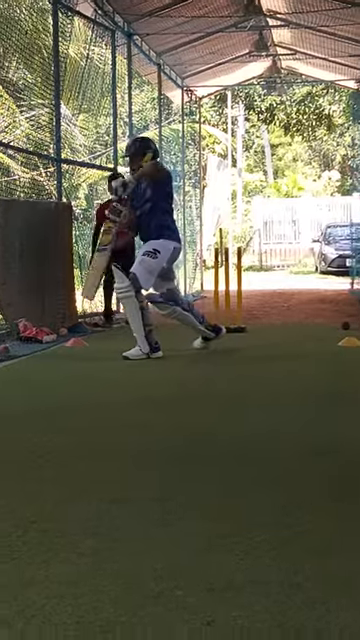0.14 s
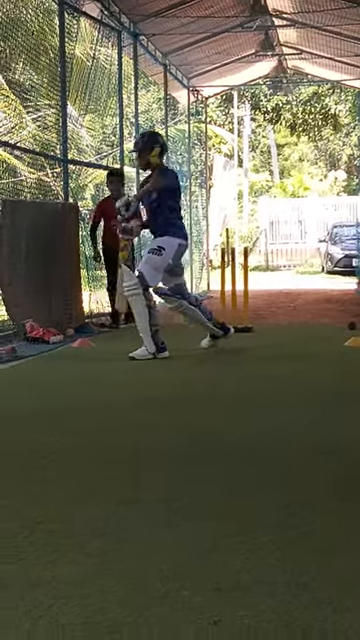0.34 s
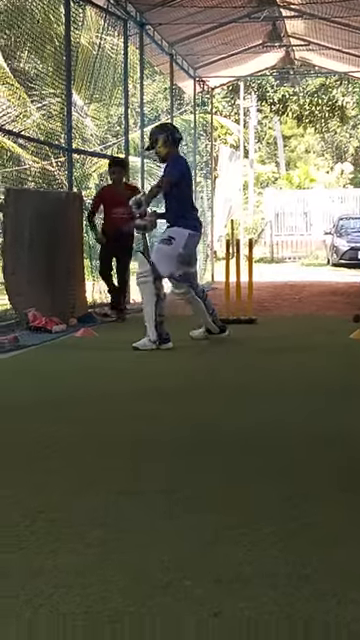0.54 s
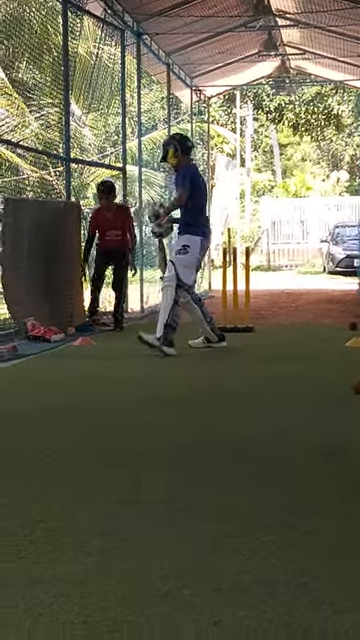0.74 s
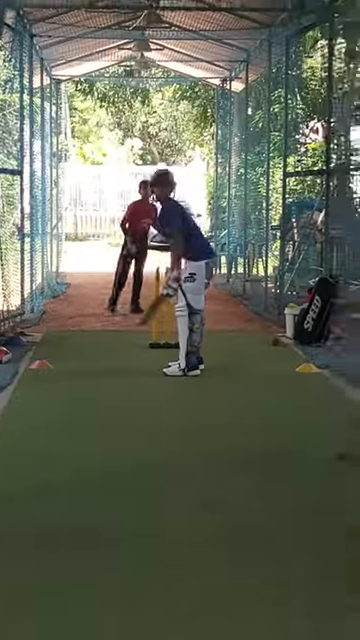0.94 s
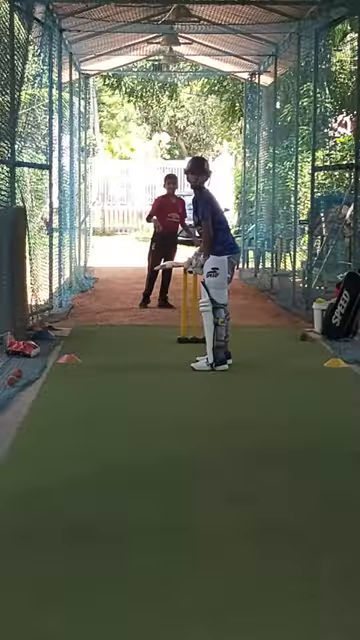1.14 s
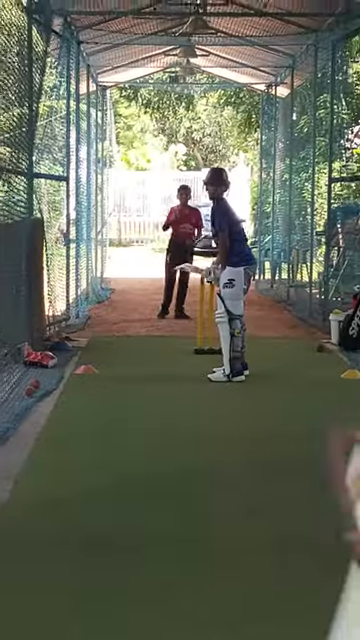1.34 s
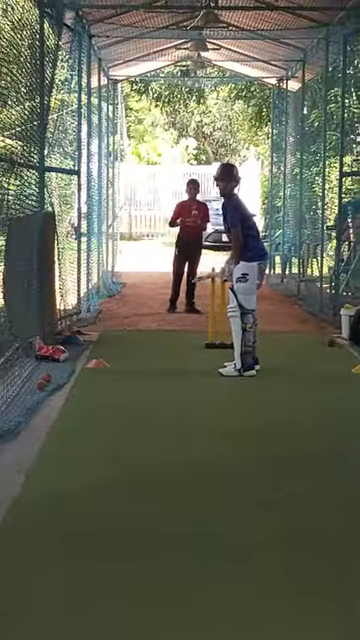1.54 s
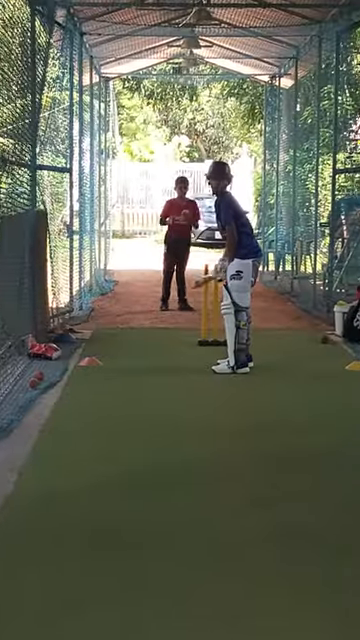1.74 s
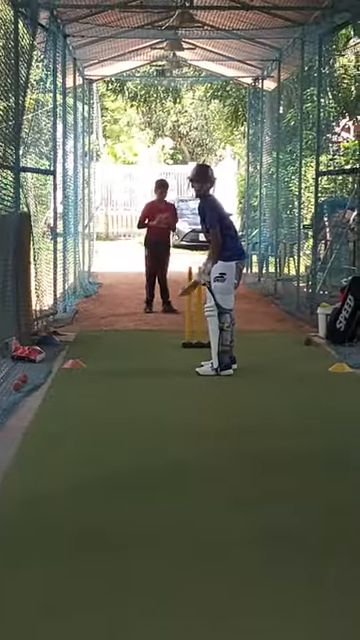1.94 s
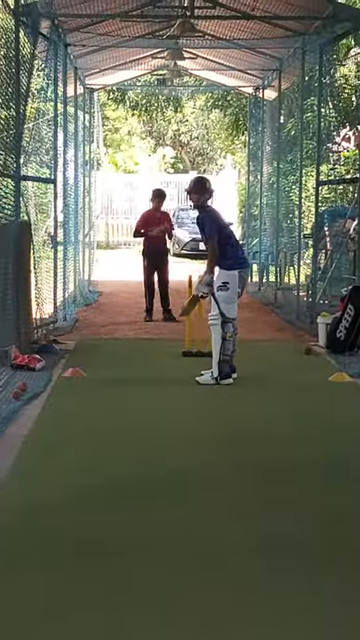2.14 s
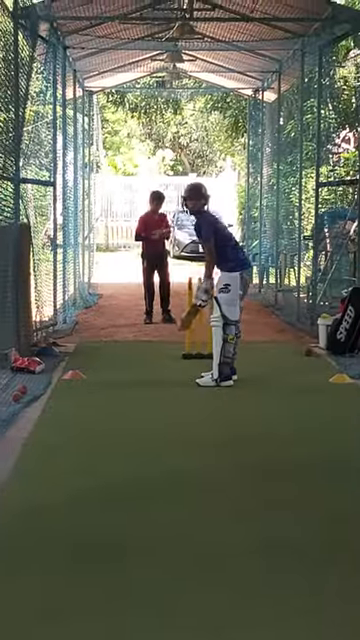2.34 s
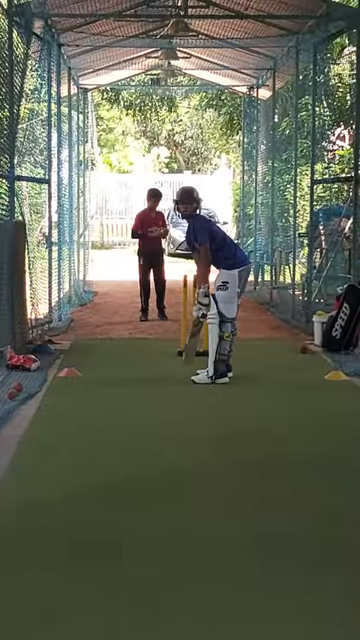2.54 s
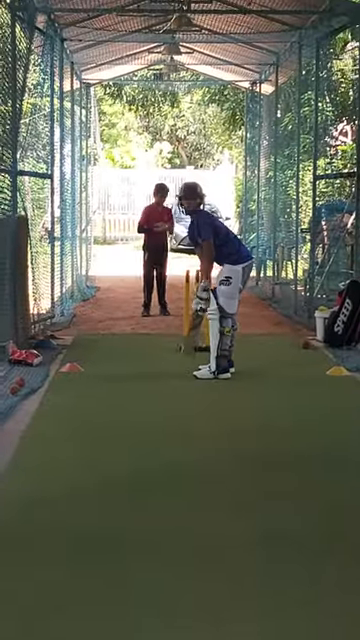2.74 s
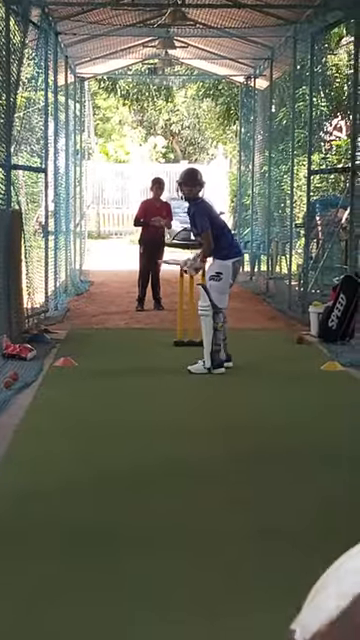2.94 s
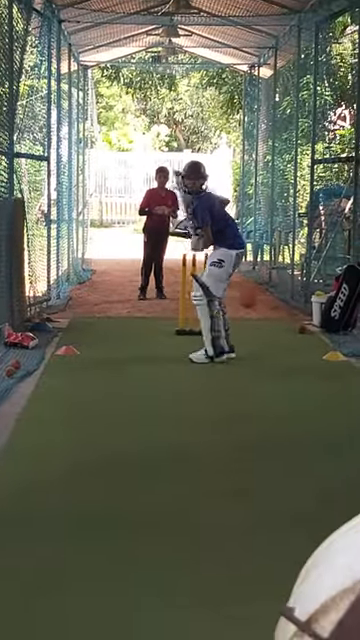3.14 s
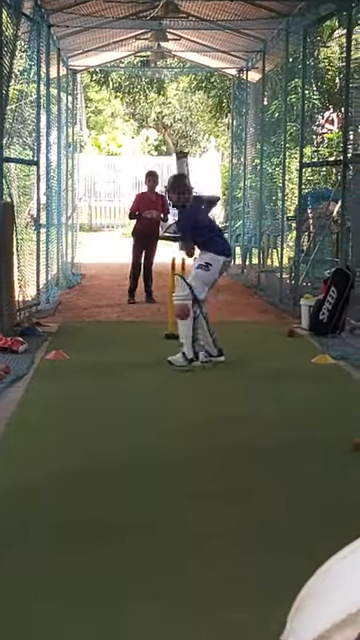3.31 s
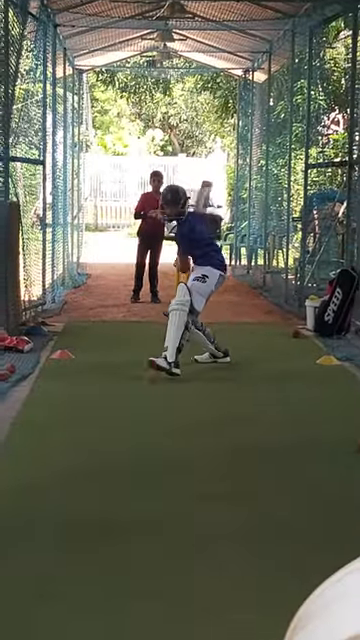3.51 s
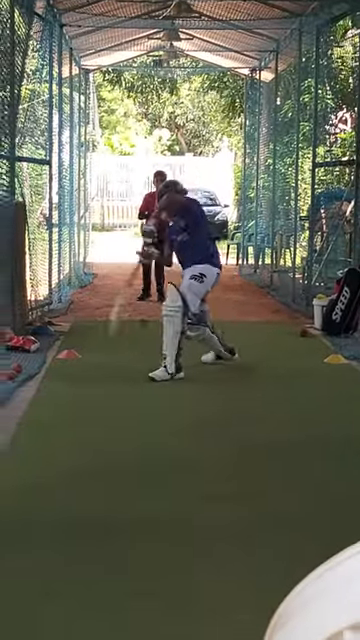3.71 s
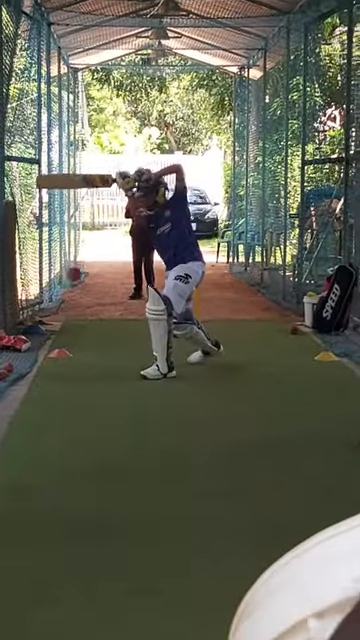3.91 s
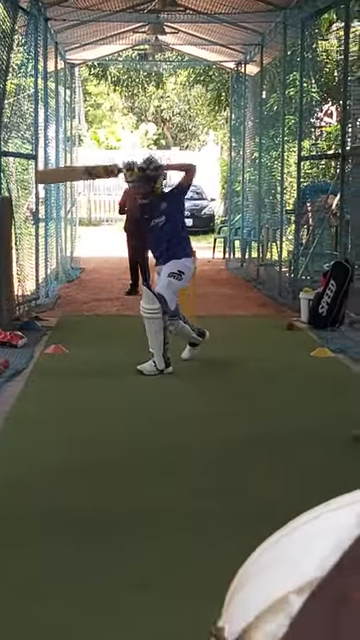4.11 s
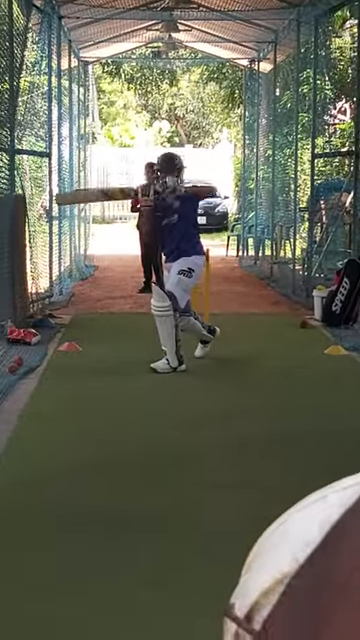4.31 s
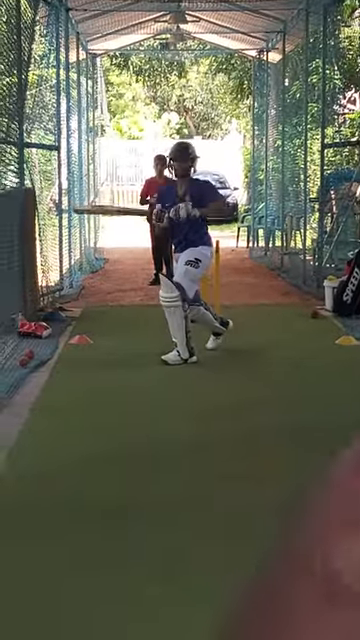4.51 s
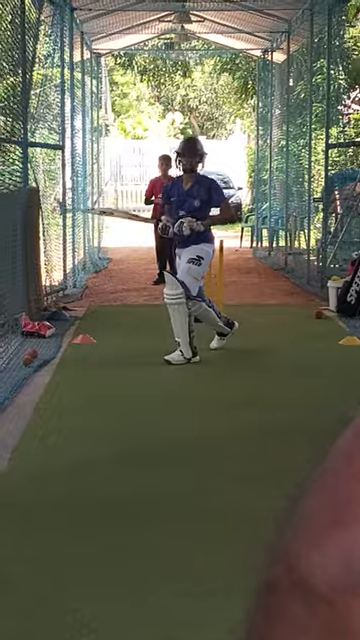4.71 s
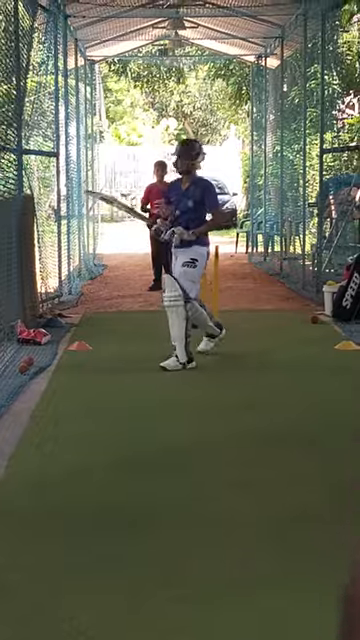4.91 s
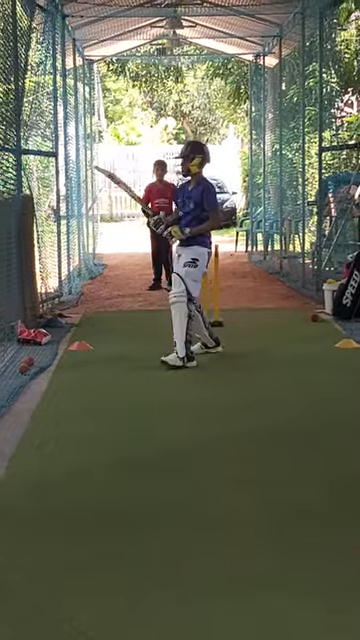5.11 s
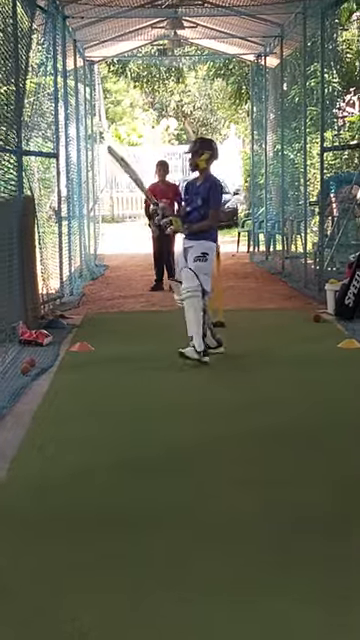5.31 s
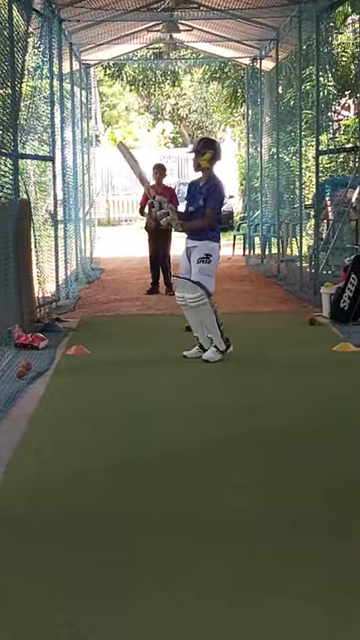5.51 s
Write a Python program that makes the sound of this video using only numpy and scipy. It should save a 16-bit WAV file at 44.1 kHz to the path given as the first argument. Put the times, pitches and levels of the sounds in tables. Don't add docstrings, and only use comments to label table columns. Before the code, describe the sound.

Steady cicada hiss and bird trills surround a bat's ground taps, one loud crack on a ball, then gritty footsteps on turf.

```python
import sys
import numpy as np
from scipy import signal
from scipy.fft import rfft, irfft, next_fast_len
from scipy.io import wavfile
from scipy.ndimage import uniform_filter1d

SR = 44100
rng = np.random.default_rng(int(sys.argv[2]) if len(sys.argv) > 2 else 0)


def voltage_ratio(level):
    return 10 ** (np.asarray(level, float) / 20)


def persist_wave(psi):
    counts = np.round(np.clip(psi, -1, 1) * 32767).astype(np.int16)
    wavfile.write(sys.argv[1], SR, np.atleast_2d(counts).T)


N = 245195
T = np.arange(N) / SR
CUT_S = 0.89
PAIR = np.array([[1], [-1]])
CICADA_HZ = 6970


def on_log(table, hz):
    f, v = np.transpose(table)
    return np.interp(np.log(np.maximum(hz, 1)), np.log(f), v)


def colour(x, gain):
    n = next_fast_len(x.shape[-1])
    hz = np.arange(n // 2 + 1) * SR / n
    return irfft(rfft(x, n) * gain(hz), n)[..., :x.shape[-1]]


def unit(x):
    return x / np.sqrt(np.mean(x ** 2))


def bell(centre_hz, width_hz):
    return lambda f: np.exp(-0.5 * ((f - centre_hz) / width_hz) ** 2)


def air(n):
    # f/Hz, correlation/1
    alike = [(60, 0.7), (130, 0.97), (290, 0.69), (640, 0.45), (1410, -0.03), (3100, 0.0085), (6820, -0.51),
             (15000, -0.13)]
    likeness = lambda f: np.clip(on_log(alike, f), 0, 0.99)
    mid, side = rng.standard_normal((2, n))
    common = colour(mid, lambda f: np.sqrt(1 + likeness(f)))
    opposed = colour(side, lambda f: np.sqrt(1 - likeness(f)))
    return common + PAIR * opposed


def walk(rate_hz):
    k = int(SR / rate_hz)
    held = np.repeat(rng.standard_normal(N // k + 1), k)
    return 1.59 * uniform_filter1d(uniform_filter1d(held, k), k)[:N]


def add(out, x, s, pan_db=0.0):
    i = int(s * SR)
    n = min(x.shape[-1], N - i)
    out[:, i:i + n] += (x * voltage_ratio(PAIR * pan_db / 2))[:, :n]


def third_octaves(x):
    for hz in 32 * 2 ** (np.arange(28) / 3):
        away = lambda f: np.clip(3 * np.log2(np.maximum(f, 1) / hz), -1, 1)
        yield hz, colour(x, lambda f: np.cos(np.pi / 2 * away(f)))


def blurred(table):
    out = np.zeros((2, N))
    for s, length_s, hz, width_hz, db in table:
        n = int(length_s * SR)
        tone = unit(colour(air(n), bell(hz, max(width_hz, 20) / 2)))
        add(out, voltage_ratio(db) * tone * signal.windows.tukey(n, 0.4), s)
    return out


def town():
    # f/Hz, level/dB per Hz
    shapes = [
        [(15, -43), (25, -23), (101, 2.5), (203, -14), (304, -11), (534, -20), (963, -17.5), (1560, -23),
         (3400, -22), (5090, -29.5), (6840, -2.5), (7610, -12.5), (9190, -41), (11100, -41), (15300, -48)],
        [(15, -40), (25, -24.5), (75, 1.5), (129, -5), (214, -14.5), (288, -11), (610, -19), (913, -13),
         (1190, -18), (1830, -18.5), (5370, -33.5), (7020, -29), (8480, -45), (11400, -47.5), (15300, -50)],
    ]
    # t/s, level/dB
    traffic = [
        [(0.0, -52), (0.5, -52.5), (0.89, -46)],
        [(0.89, -54), (1.2, -55), (1.88, -52.5), (2.2, -54), (2.64, -51), (3.2, -53), (3.75, -50.5),
         (4.3, -52.5), (4.8, -49), (5.1, -43.5), (5.56, -47.5)],
    ]
    # t/s, level/dB
    breeze = [
        [(0.0, -49.5), (0.28, -53), (0.466, -48.5), (0.89, -55)],
        [(0.89, -57.5), (1.44, -57.5), (1.88, -53), (2.44, -56.5), (2.64, -48.5), (3.13, -52), (3.8, -42),
         (4.3, -50.5), (4.9, -50), (5.1, -44), (5.56, -47.5)],
    ]
    out = np.zeros((2, N))
    for shape, traffic_curve, breeze_curve in zip(shapes, traffic, breeze):
        s, traffic_db = np.transpose(traffic_curve)
        breeze_s, leaves_db = np.transpose(breeze_curve)
        low = np.interp(T, s, traffic_db)
        leaves = np.interp(T, breeze_s, leaves_db)
        hum = unit(colour(air(N), lambda f: voltage_ratio(on_log(shape, f) - 14.6 * bell(CICADA_HZ, 900)(f))))
        present = (T >= s[0]) & (T < s[-1] + (s[0] > 0))
        for hz, band in third_octaves(hum):
            high = np.clip(np.log2(hz / 900) / 2, 0, 1)
            traffic_level = low + 2.5 * walk(8)
            leaf_level = (leaves if hz < 7000 else leaves_db.mean()) + 1.1 * walk(11)
            db = (1 - high) * traffic_level + high * leaf_level
            out += band * voltage_ratio(db + 2.5) * present
    return out * voltage_ratio(PAIR * -2.5)


def cicadas():
    # t/s, level/dB
    chorus = [(0.0, -61), (0.71, -57.5), (0.85, -57), (0.96, -64.5), (1.3, -62.5), (1.84, -59.5),
              (2.63, -58.5), (4.12, -61), (5.26, -59), (5.56, -57.5)]
    width_hz, throb_hz = 970, 10.8
    clicks = rng.standard_normal((2, N)) * voltage_ratio(1.3 * walk(300))
    beat = np.sin(2 * np.pi * throb_hz * T + 0.35 * walk(1.94))
    throb = voltage_ratio(0.94 * beat * (T > CUT_S))
    song = unit(colour(clicks, bell(CICADA_HZ, width_hz / 2)))
    return song * throb * voltage_ratio(np.interp(T, *np.transpose(chorus)) + PAIR * 3.96)


def birds():
    # t/s, length/s, f/Hz, width/Hz, level/dB
    whistles = [(.02, 0.068, 3340, 90, -57.5), (.27, 0.25, 3610, 450, -59), (0.361, 0.15, 2400, 352, -58),
                (0.395, .04, 4300, 60, -60), (0.43, 0.17, 4310, 70, -60.5), (.44, 0.11, 2650, 100, -60),
                (.34, .08, 5400, 300, -67), (0.62, .11, 4320, 60, -71), (.66, 0.16, 4890, 150, -64),
                (.755, 0.055, 4200, 90, -56), (.8, 0.052, 4250, 120, -56), (.84, .049, 4180, 120, -59),
                (2.998, 0.21, 3930, 500, -63.5), (3.505, 0.025, 2750, 200, -52.5),
                (3.53, 0.03, 2700, 150, -48), (3.562, .05, 2700, 170, -50), (3.63, .07, 2750, 300, -48),
                (3.71, .06, 2800, 250, -54), (3.969, 0.079, 2610, 260, -52.5),
                (4.129, 0.061, 2600, 120, -52), (4.2, 0.056, 2080, 80, -55), (3.22, 0.067, 2380, 100, -63)]
    # t/s, peak level/dB, f/Hz
    near_notes = [(2.464, -39, 1030), (2.502, -40, 1000), (2.535, -40, 987), (2.569, -41.5, 960),
                  (2.596, -39, 955), (2.617, -38, 947), (2.645, -44, 940), (3.423, -39.5, 1035),
                  (3.456, -40, 988), (3.488, -37, 989), (3.524, -41, 957), (3.558, -40, 942),
                  (4.400, -41, 1010), (4.428, -39.5, 986), (4.462, -39, 970), (4.495, -36, 968),
                  (4.515, -38, 957), (5.396, -37, 1025), (5.424, -38, 1000), (5.460, -37, 985),
                  (5.495, -37.5, 962), (5.528, -38, 955)]
    # t/s, peak level/dB, f/Hz
    far_notes = [(1.289, -51, 918), (1.354, -51, 930), (1.427, -50, 924), (1.469, -50, 923),
                 (1.509, -51, 910), (1.728, -50, 921), (1.772, -51, 870), (1.823, -50, 864),
                 (1.898, -47, 845), (1.929, -49, 923), (1.959, -49, 866), (2.009, -43, 910),
                 (2.072, -44, 918), (2.113, -43, 920), (2.149, -50, 923), (2.328, -50, 910),
                 (2.359, -49, 861), (2.703, -47, 867), (2.746, -45, 935), (2.817, -53, 915),
                 (2.89, -50, 990), (2.936, -42.5, 915), (2.995, -51, 864), (3.247, -50, 950),
                 (3.284, -41, 920), (3.329, -45, 875), (3.389, -43.5, 873), (3.997, -42.5, 884),
                 (4.07, -43, 928), (4.142, -42.5, 930), (4.202, -48, 923), (4.253, -46, 920),
                 (4.312, -48, 888)]
    fades_ms = [22.3, 31]
    out, t = blurred(whistles), T[:SR // 8]
    for notes, fade_ms, trim_db, pan_db in zip((near_notes, far_notes), fades_ms, (-2, -4), (-4.0, -5.0)):
        for s, db, hz in notes:
            tone = np.sin(2 * np.pi * 1.025 * hz * (t - 0.99 * t * t))
            note = tone * np.minimum(t / 0.0037, 1) * np.exp(-(1000 * t / fade_ms) ** 2)
            add(out, voltage_ratio(db + trim_db) * note[None], s - 0.002, pan_db)
    tree_t = T[:SR // 4]
    trees = rng.standard_normal((2, len(tree_t))) * 1000 ** (-tree_t / 0.5)
    smeared = np.zeros((2, N))
    for moment in (T < CUT_S, T >= CUT_S):
        smeared += moment * signal.fftconvolve(moment * out, trees, axes=1)[:, :N]
    return out + voltage_ratio(-39) * smeared


def scuffs():
    # t/s, kind, attack/s, hold/s, release/s, level/dB
    strokes = [(0.036, 'brush', .005, .02, 0.08, -55.5), (.74, 'scrape', 0.06, 0.009, 0.12, -49),
               (1.067, 'scrape', .006, 0.053, .03, -56), (2.03, 'scrape', .016, .005, .05, -56),
               (3.629, 'skid', .003, 0.028, 0.098, -42.5), (4.451, 'drag', .004, .035, 0.016, -42.5),
               (4.487, 'drag', 0.011, 0.046, 0.15, -35.5), (4.523, 'drag', 0.014, 0.0027, 0.011, -30.5),
               (4.633, 'drag', 0.06, 0.024, .06, -50), (4.884, 'brush', 0.006, 0.036, 0.057, -40.5),
               (4.952, 'shuffle', .02, 0.056, 0.25, -54.5), (5.12, 'scrape', 0.0087, 0.15, 0.056, -47.5),
               (5.281, 'scrape', 0.012, 0.0026, 0.013, -38.5), (5.293, 'shuffle', 0.0086, 0.26, 0.061, -59),
               (5.538, 'scrape', .02, .02, .01, -48.5)]
    # kind, fibre hiss level/dB, rumble level/dB
    soles = [('brush', -11.5, 0), ('scrape', -20, -6.5), ('drag', -10.5, -17), ('skid', -31, -18),
             ('shuffle', -11.5, 9.7)]
    # f/Hz, level/dB per Hz
    grit_shape = [(290, -51), (500, -10.5), (813, -17), (960, 3.5), (1080, -7.5), (1350, -3), (2690, -5),
                  (8500, -25), (11000, -79), (18700, -120)]
    # t/s, peak level/dB, f/Hz
    slips = [(0.0394, -50, 3500), (0.584, -41.5, 2520), (3.635, -26, 1590), (3.648, -31, 2900),
             (3.6588, -29.5, 2800), (3.677, -31, 1620), (4.4494, -31, 2900), (4.461, -29, 2080),
             (4.467, -30, 3000), (4.4728, -23, 2300), (4.4902, -26, 2400), (4.4962, -25, 1400),
             (4.499, -30, 2720), (4.504, -30, 2300), (4.509, -30, 2800), (4.5154, -20, 2600),
             (4.5225, -31, 3800), (4.5285, -30, 4300), (4.532, -31, 4400), (4.5, -33, 4520),
             (4.504, -33, 4200), (4.4615, -32, 3800), (4.544, -30, 3500), (4.533, -26, 1690),
             (4.552, -32, 1500), (4.595, -30, 1740), (3.64, -36, 3900), (3.653, -36, 3800),
             (3.684, -33, 2800), (4.922, -32, 1500), (4.8873, -34, 5160), (4.9043, -34, 2740),
             (4.9142, -30.5, 2390), (5.2875, -32, 1920), (5.294, -34, 1600)]
    # t/s, length/s, f/Hz, width/Hz, level/dB
    rustles = [(1.065, 0.055, 1980, 700, -50.5), (.03, 0.059, 265, 200, -48.5), (4.95, .06, 215, 130, -35),
               (5.02, .28, 800, 400, -52), (5.13, .1, 3000, 1200, -55), (2.4, .1, 2000, 1400, -56),
               (2.036, 0.042, 1910, 380, -53), (.035, 0.0108, 4360, 1300, -47.5),
               (1.4, 0.078, 950, 220, -66), (.96, .1, 390, 86, -58), (.41, 0.06, 270, 107, -48),
               (3.64, 0.0273, 1490, 200, -37), (4.632, 0.272, 367, 38, -48), (5.0, 0.5, 368, 29, -49.5),
               (4.905, 0.0193, 2570, 660, -41.5), (4.92, 0.017, 1140, 660, -44), (6, 0.026, 1700, 480, -55)]
    out = np.zeros((2, N))
    grains = air(N) * voltage_ratio(1.5 * rng.exponential(size=N)) * voltage_ratio(1.2 * walk(200))
    grit = unit(colour(grains, lambda f: voltage_ratio(on_log(grit_shape, f))))
    hiss = unit(colour(grains, bell(11840, 2150)))
    rumble = unit(colour(air(N), bell(237, 175))) * voltage_ratio(2.3 * walk(30))
    sole_levels = {kind: (hiss_db, low_db) for kind, hiss_db, low_db in soles}
    for s, kind, attack, hold, release, db in strokes:
        hiss_db, low_db = sole_levels[kind]
        away = np.maximum((s + attack - T) / attack, (T - s - attack - hold) / release)
        on = 10 ** -np.clip(away, 0, 5) * ((s > CUT_S) | (T < CUT_S))
        out += on * voltage_ratio(db) * (grit + voltage_ratio(hiss_db) * hiss + voltage_ratio(low_db) * rumble)
    t = T[:SR // 40]
    ring_share = 0.4
    for s, db, hz in slips:
        band = lambda f: bell(hz, 600)(f) + 0.19 * bell(4200, 1500)(f) + 0.014 * bell(12000, 3000)(f)
        rasp = unit(colour(rng.standard_normal((2, len(t))), band))
        squeak = 1.5 * np.sin(2 * np.pi * hz * t * (1 - 3 * t))
        slip = (1 - ring_share) * rasp + ring_share * squeak
        add(out, 0.67 * voltage_ratio(db) * slip * t / 0.0024 * np.exp(1 - t / 0.0018), s)
    return (out + blurred(rustles)) * voltage_ratio(PAIR * -2.5)


def blows():
    # t/s, body, peak level/dB, contact/ms, net ring level/dB, left minus right/dB
    hits = [(2.413, 'ball', -25, 0.56, -19, -10), (2.4216, 'turf', -21.5, 1.55, -23, -1),
            (2.4243, 'toe', -9, 0.25, -31.5, -5), (2.4276, 'blade', -7.5, 0.43, -39, -3.5),
            (2.4292, 'blade', -7.5, 0.26, -39, -9), (2.674, 'turf', -13, 1.32, -17.5, -4.5),
            (3.627, 'ball', -24, 0.36, -12, -3), (3.7698, 'bat', 3.2, 0.29, -23, -4),
            (4.5425, 'heel', -7.5, 1.01, -28, -4.5), (4.929, 'heel', -19, 0.64, -27, -6),
            (4.9341, 'shoe', -17, 2.2, -31, -3), (4.9388, 'shoe', -13, 2.3, -26, 0.5),
            (5.504, 'shoe', -22.5, 2.25, -24, -3), (.218, 'ball', -41, 1.2, -12, -3),
            (.226, 'heel', -36.5, 0.57, -18.5, -2), (3.12, 'heel', -36, 0.39, -13.5, -8.5),
            (4.787, 'turf', -33, 0.5, -27, 0)]
    # f/Hz, level/dB, t60/s
    bat = [(194, -15, 0.15), (325, 3, 0.026), (300, -16.5, .14), (527, -11.5, 0.036), (750, 5.5, 0.01),
           (1000, -6, 0.0026), (1550, -2.5, 0.0091), (1840, -8, 0.013), (2610, -14.5, 0.044),
           (6300, -18, .006)]
    bat_toe = [(220, 6, 0.019), (450, -18, 0.018), (736, -12.5, 0.09), (920, -31, 0.01), (1440, -13, 0.022),
               (2290, -3, 0.0091), (2900, -6, 0.0065), (3680, -5, 0.0054), (5400, -10, 0.0059)]
    turf = [(170, -2.5, 0.07), (311.2, -3, 0.19), (353, -2, .03), (473, -14, .03), (606, -15, 0.05),
            (900, -10, 0.023), (1500, -14, .04), (1990, -7, 0.04)]
    ball = [(400, -3, 0.021), (824, 7.5, 0.015), (1400, -4.5, 0.034), (2240, -14, .02), (3180, -3, .015)]
    heel = [(131, -13, 0.053), (297, 3, 0.022), (387, 10, 0.0088), (860, -5, 0.024), (1370, -10, 0.014)]
    shoe = [(162, -13, 0.11), (200, 3.5, 0.072), (322, -11.5, 0.049), (480, -12, 0.028)]
    blade = [(500, -0.5, 0.046), (910, 4, 0.014), (1035, 10.5, 0.023), (1480, -2, 0.026)]
    bodies = {
        "bat": (bat, -15.5, -3.2), "toe": (bat_toe, -38, -6.5), "turf": (turf, -24, -7),
        "ball": (ball, -25, -1.4), "heel": (heel, -14, -9.5), "shoe": (shoe, -36, -4),
        "blade": (blade, -36, -25)}
    # delay/ms, left level/dB, right level/dB, strongest f/Hz
    echoes = [(1.3, -13, 2.5, 1080), (2.7, -17, 0.5, 364), (4.3, 3, -9, 12000), (5.5, -1.5, -1.5, 720),
              (6.8, -24, 5, 1670), (7.9, -20, 7.5, 1730), (10.8, -25, 4, 1800), (15, -10, -18, 660)]
    # f/Hz, level/dB per Hz
    net_shape = [(47, -52), (80, -11), (232, -8.5), (303, 2), (404, -4.5), (560, -9.5), (896, -12.5),
                 (1340, -14.5), (1820, -9.5), (3240, -17.5), (12000, -30), (16000, -40)]
    # f/Hz, t60/s
    net_t60 = [(100, 0.33), (300, 0.26), (700, 0.42), (2000, 0.35), (5000, 0.31), (12000, 0.49)]
    out, t = np.zeros((2, N)), T[:SR // 2]
    for s, body, db, contact_ms, ring_db, pan_db in hits:
        modes, crack_db, echo_db = bodies[body]
        push = np.hanning(int(contact_ms * SR / 1000) + 3)
        ring = -sum(voltage_ratio(g) * np.sin(2 * np.pi * f * t) * 1000 ** (-t / t60) for f, g, t60 in modes)
        ring = signal.fftconvolve(ring, push)[:len(t)]
        ring = signal.lfilter(*signal.butter(2, 130.0, "high", fs=SR), ring)
        soft = lambda f: 1 / (1 + (f * contact_ms / 2500) ** 2)
        crack = unit(colour(rng.standard_normal((2, len(t))), soft)) * np.exp(-t / 0.0011)
        direct = ring / np.abs(ring).max() + voltage_ratio(crack_db) * crack
        heard = direct.copy()
        for ms, left_db, right_db, hz in echoes:
            k = int(ms * SR / 1000)
            surface = signal.iirpeak(hz, 0.6, fs=SR)
            echo = signal.lfilter(*surface, signal.lfilter(*surface, direct[:, :-k]))
            heard[:, k:] += voltage_ratio(echo_db + np.array([[left_db], [right_db]])) * echo
        net = lambda f: voltage_ratio(on_log(net_shape, f)) * soft(f) ** (2.8 * contact_ms - 1)
        top = lambda f: 1 / (1 + (f / 3500) ** 4) + voltage_ratio(crack_db + 10.0)
        wash = unit(colour(air(len(t)), lambda f: net(f) * top(f)))
        tail = sum(band * 1000 ** (-t / on_log(net_t60, hz)) for hz, band in third_octaves(wash))
        tail = tail * (1 - np.exp(-t / 0.00068))
        add(out, voltage_ratio(db) * (0.74 * heard + voltage_ratio(ring_db) * tail), s, pan_db)
    return out


def scene():
    return town() + cicadas() + birds() + scuffs() + blows()


def band_limit(x):
    return signal.sosfilt(signal.butter(12, 16470, fs=SR, output="sos"), x)


def record(dry):
    # f/Hz, left minus right/dB
    port_shape = [(60, 0), (200, -2), (700, 1.5), (1300, 0), (2400, -3.5), (4400, 11.5), (8000, 6.5),
                  (15000, 6.5)]
    top_hz = 15800
    x = colour(dry, lambda f: voltage_ratio(PAIR * on_log(port_shape, f) / 2) * (f < top_hz))
    return band_limit(np.tanh(0.8 * x) / 0.8)


dry = scene()
out = record(dry)
persist_wave(out)
```